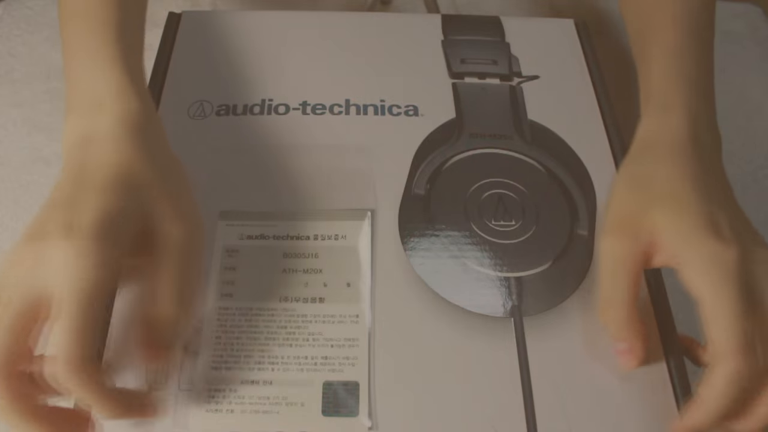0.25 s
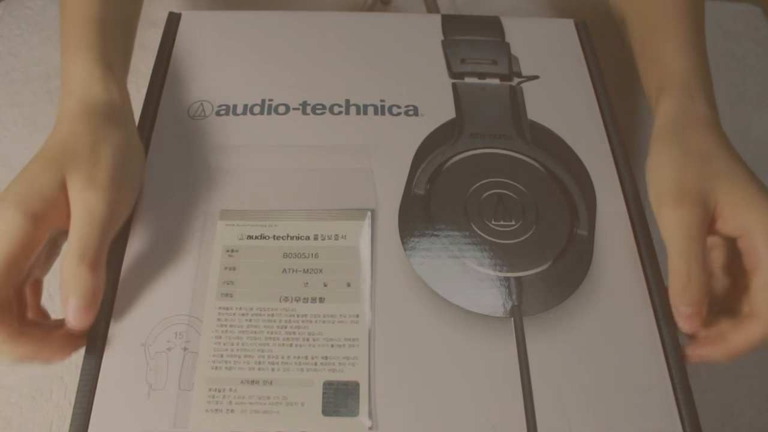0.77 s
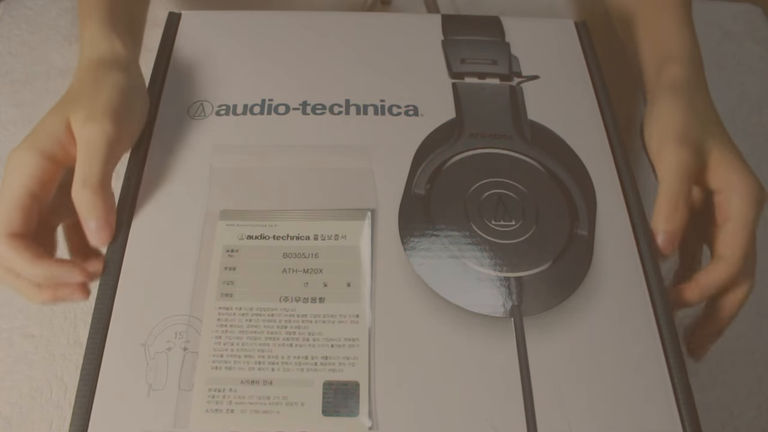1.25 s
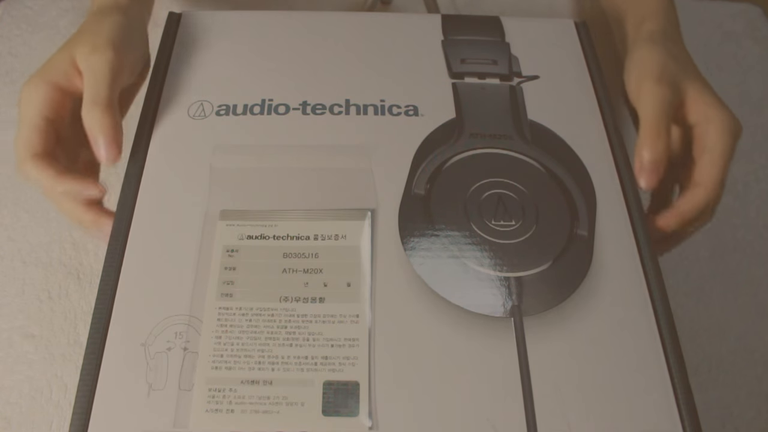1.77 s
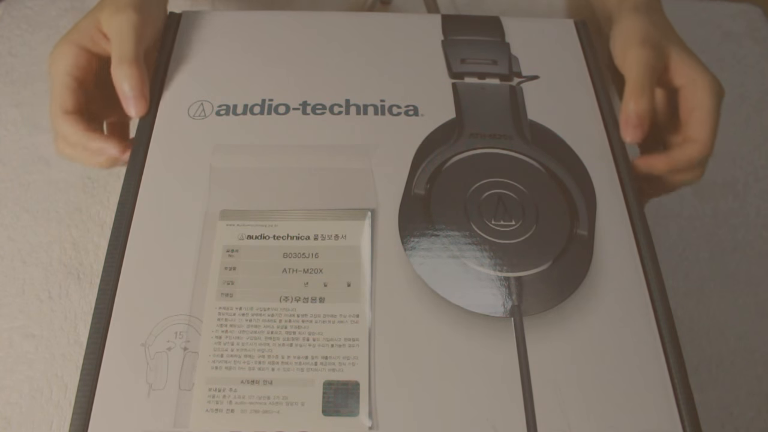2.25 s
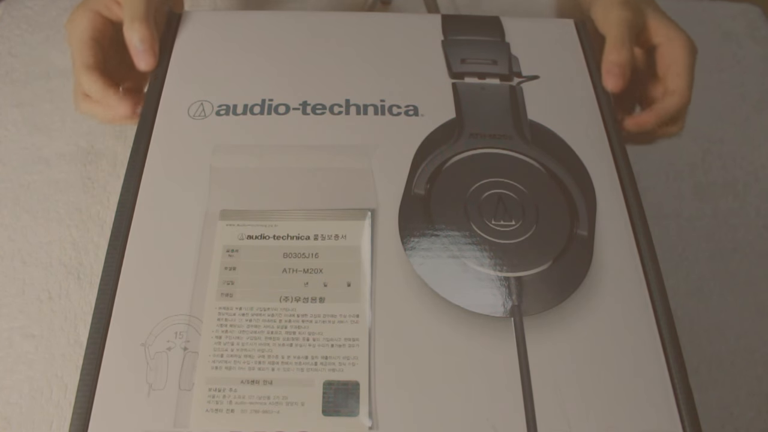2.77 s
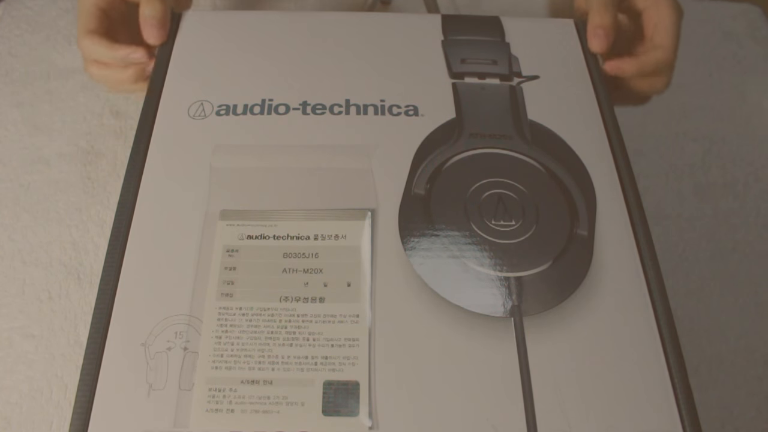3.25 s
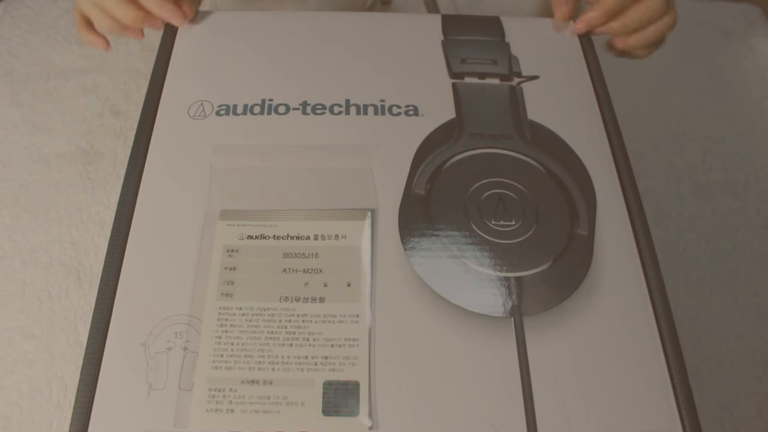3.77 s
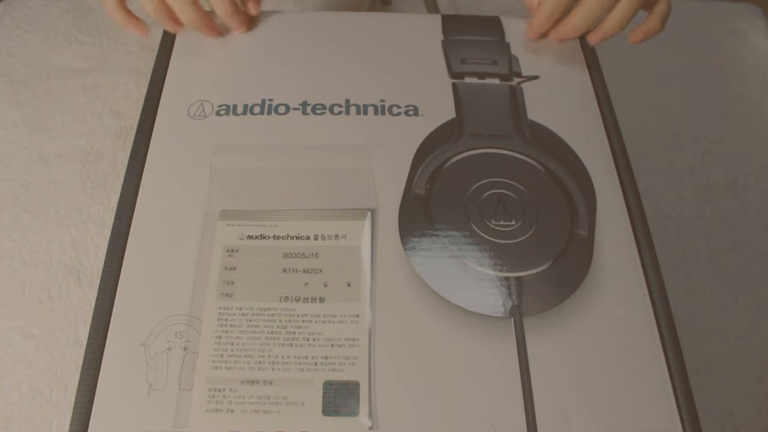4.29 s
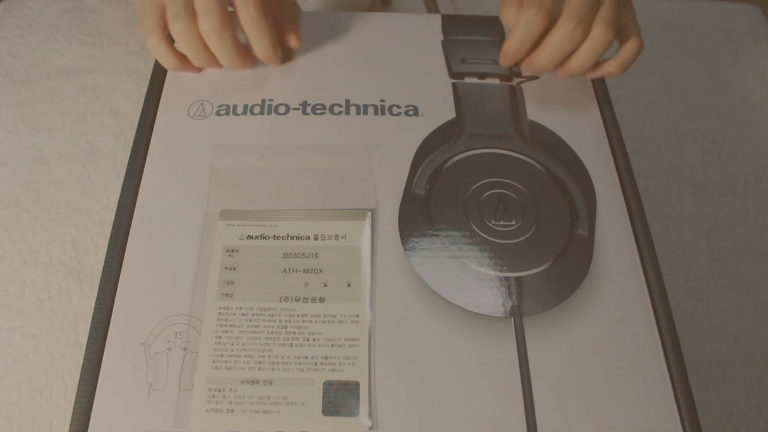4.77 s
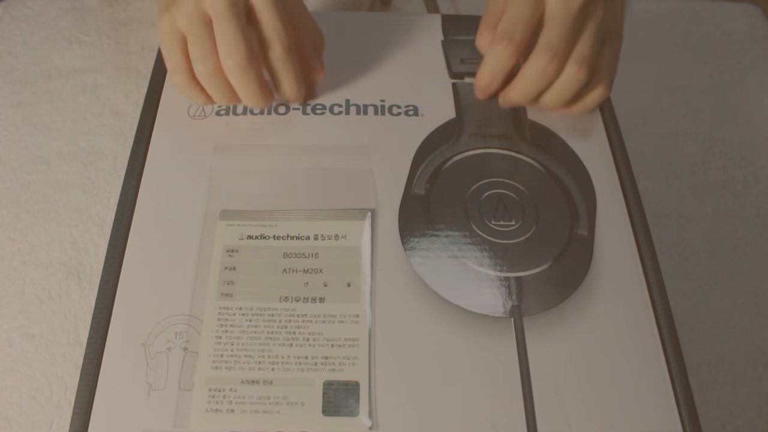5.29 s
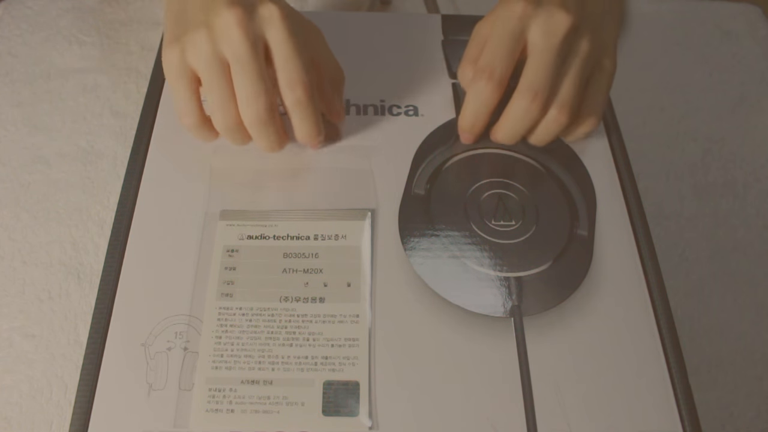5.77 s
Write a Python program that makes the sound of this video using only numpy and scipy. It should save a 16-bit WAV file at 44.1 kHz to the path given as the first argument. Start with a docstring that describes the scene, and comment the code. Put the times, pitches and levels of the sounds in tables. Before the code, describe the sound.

Hands brush quietly over a cardboard box, then fingers tap its side walls in uneven clusters of low, hollow, short thumps with small nail ticks. After a pause with light rubbing, the taps move to the lid and become harder, drier and more frequent. Faint scratchy sliding runs between them. Very close stereo microphones in a quiet small room, with a soft low noise floor.

```python
"""Fingers on a cardboard box

Fingertips and nails tap and slide along a hollow cardboard box in a quiet room, close to a crossed pair of mics.
Each tap is a sum of short decaying box modes plus a tick of noise from the nail, with a room answer.
Sliding skin and nails are fluttering friction noise heard through resonances, over a steady noise floor."""
import sys
import numpy as np
from scipy import signal
from scipy.fft import rfft, irfft, next_fast_len
from scipy.io import wavfile
from scipy.ndimage import uniform_filter1d, map_coordinates

SR = 44100
rng = np.random.default_rng(int(sys.argv[2]) if len(sys.argv) > 2 else 0)


def log_audio(samples):
    """Write samples as a 16-bit WAV file to the path given in sys.argv[1]."""
    # one column per channel
    frames = np.atleast_2d(samples).T
    # limit to full scale, then quantise
    limited = np.clip(frames, -1, 1)
    pcm = np.round(limited * 32767).astype(np.int16)
    wavfile.write(sys.argv[1], SR, pcm)


N = 266364

# strokes of the hands over the box: fastest_s, speeding_up_s, slowing_s,
# shake_db, drag_db, scrape_db, hiss_db, swish_db (levels at the fastest moment),
# drag_bright, scrape_bright, hiss_bright, swish_bright (0 dull to 1 bright), left_right_db
STROKES = [(.006, .006, .05, -58, -49.5, -56, -57.5, -64.5, 0.43, .6, 0.12, 0.63, 1),
           (.048, 0.02, .04, -53, -56.5, -79, -74, -58.5, 0.6, .2, .3, 1, -1.2),
           (.098, 0.015, .05, -58.5, -55, -64.5, -69, -60, 0.15, .7, 0.27, 0.97, 0.3),
           (.181, 0.038, 0.014, -57, -52.5, -66, -66.5, -59, 0.57, 0.11, .3, 0.83, 0),
           (.287, 0.032, 0.2, -59, -63, -64, -63.5, -71, 0.8, 0.68, .45, .8, 1.2),
           (.48, .12, 0.24, -63, -63, -66.5, -66.5, -72, 0.9, 0.85, 0.35, .9, 2.2),
           (.755, 0.29, 0.17, -69, -61, -58.5, -60.5, -64, 0.64, 0.72, 0.68, 0.72, 0.3),
           (.909, 0.14, .055, -67, -56, -64.5, -58, -56, 0.5, 0.56, 0.97, .6, 3),
           (1.05, .1, 0.11, -54, -67, -65.5, -63.5, -66.5, 0.5, 0.67, .6, 0.28, 3),
           (1.15, 0.13, .08, -79, -61, -69.5, -67, -69.5, 0.28, 1, 0.93, 0.4, 4),
           (1.45, .2, 0.1, -89, -85, -91, -76, -79, 0.1, 0.6, 0.74, .45, 3),
           (1.86, 0.047, 0.085, -66, -63, -73.5, -91, -94, .36, 0.1, .4, .45, -2),
           (2.08, 0.04, 0.082, -55, -55.5, -64.5, -68.5, -89, 0.6, .45, .4, .45, 2.5),
           (2.265, 0.072, .015, -61, -60, -65.5, -70.5, -72, .4, .85, 0.27, .3, 6),
           (2.289, 0.015, 0.047, -60, -54, -53, -57.5, -66, 0.5, 0.6, 0.16, 0.4, 0),
           (2.363, 0.024, 0.055, -56, -47, -59.5, -61.5, -60, 0, .3, .55, .05, 5),
           (2.43, 0.048, 0.11, -52.5, -54, -67, -64, -70, 0.11, 0, 0.72, .05, -0.5),
           (2.82, .035, .05, -57, -56, -62, -67.5, -65.5, 0.6, 0.7, 0.22, 0.22, -7),
           (2.885, 0.055, 0.11, -62, -56.5, -63.5, -64.5, -64, 0.6, 0.6, .6, .05, 1.5),
           (3.004, 0.019, 0.096, -46, -48, -62, -53.5, -58, 0.43, 0.15, 0.9, .2, 4.5),
           (3.15, 0.1, 0.22, -66, -67, -75, -66.5, -75, 0.7, 0.38, 0.71, 0.34, 5),
           (3.277, 0.018, 0.07, -51, -52.5, -63, -50, -56.5, 0.46, 0.61, .15, 0.37, -2),
           (3.385, 0.13, 0.094, -53, -57.5, -65, -53, -62.5, 0.66, .44, 0.51, 0.78, 0.5),
           (3.62, 0.11, 0.075, -68, -57.5, -67, -68, -74, 0.46, 0.3, .1, .3, 6),
           (3.69, 0.096, 0.1, -74, -60.5, -64, -68.5, -69.5, 0.5, 0.09, 0.78, .7, -1),
           (3.941, 0.041, 0.072, -58, -60.5, -64, -77, -87, 0.82, 0.046, .4, .45, 0.3),
           (4.1, .08, 0.14, -54, -71, -62.5, -65.5, -75, 0.2, 0.045, 0.77, 0.24, 3.5),
           (4.245, 0.13, 0.12, -50.5, -60.5, -56.5, -61, -77, 0.34, 0.088, 0.21, 0.34, 3.5),
           (4.393, 0.088, 0.063, -54, -60, -54.5, -64, -66.5, 0.67, 0.31, 0.51, 0.12, 2),
           (4.535, 0.021, 0.048, -55, -54, -56, -66.5, -72, 0.4, 0.017, .7, 0.32, 1.2),
           (4.68, 0.11, 0.11, -59, -59.5, -58, -71, -84, .45, 0.24, 0.39, .45, 2),
           (4.798, 0.087, 0.028, -50, -56.5, -51.5, -60, -62, 0.7, 0.27, .7, .2, 0.3),
           (4.87, .065, 0.11, -69, -59, -56, -68, -69, 0.93, 0.047, 0.37, 0.49, -4.5),
           (4.97, 0.11, 0.017, -69, -55.5, -57.5, -76, -69.5, 0.86, 0.017, 0.16, .9, -1),
           (5.114, 0.023, 0.019, -61, -53, -64, -76, -80, 0.6, 0.43, 0.25, .45, 1),
           (5.21, 0.047, 0.11, -60, -58.5, -59.5, -75, -79, 0.5, .05, .4, .1, -3.5),
           (5.347, 0.11, 0.018, -55, -57, -55, -61, -58, .6, 0.33, 0.75, 0.06, -3),
           (5.39, 0.043, 0.17, -74, -58.5, -64.5, -71.5, -72, 0.5, 0.02, .8, .45, -1.2),
           (5.655, 0.041, 0.051, -57, -69, -78, -81, -87, .4, .55, .55, .45, 3),
           (5.885, 0.027, 0.03, -55, -64, -63, -64.5, -76, 0.2, 0.054, 0.55, .6, -3),
           (5.96, 0.046, 0.023, -61, -66, -66.5, -73, -70, .45, 0.017, 0.37, 0.53, -2.2)]


def amp(db):
    """Gain of a level in dB."""
    return 10 ** (np.asarray(db) / 20)


def unit(x):
    """Scaled to rms 1."""
    return x / np.sqrt(np.mean(x ** 2) + 1e-20)


def along(points, hz):
    """Values read between (Hz, value) points on a log frequency axis."""
    point_hz, value = np.transpose(points)
    return np.interp(np.log(hz + 1), np.log(point_hz + 1), value)


def filtered(x, response):
    """x times a complex response of frequency, padded so that the ringing does not wrap round."""
    m = next_fast_len(x.shape[-1] + 8192)
    return irfft(rfft(x, m) * response(np.fft.rfftfreq(m, 1 / SR)), m)[..., :x.shape[-1]]


def wobble(rate):
    """A smooth random curve, rate knots a second."""
    knots = rng.standard_normal(int(N * rate / SR) + 4)
    return map_coordinates(knots, [np.arange(N) * rate / SR])


def paired(a, b, alike):
    """Left and right from a shared and a differing signal; alike is their correlation at equal powers."""
    turn = np.arccos(np.clip(alike, -1, 1)) / 2
    shared, differing = np.cos(turn) * a, np.sin(turn) * b
    return np.array([shared + differing, shared - differing])


def sides(db):
    """Left and right gains of a level difference."""
    return amp(np.array([db / 2, -db / 2]))


def taps():
    """Each finger rings the modes at strengths set by where and how hard it lands; the nail adds a short tick."""
    # finger landings: start_s, knock_db, boom_db, hollow_db, rap_db, click_db, tick_db, tick_hz, thud_db,
    # left_right_db (levels before the trims below)
    landings = [(0.257, -48.5, -59, -56, -58.5, -59, -55, 4330, -62, 1.5),
                (0.68, -50.5, -46, -57, -77, -53, -63, 5770, -61, -1),
                (0.844, -54, -46.5, -58, -66, -62, -56, 4860, -58, -5),
                (1.004, -55, -54.5, -58, -65, -65, -58, 4960, -60, -6),
                (1.553, -37, -39.5, -57, -55, -48.5, -61, 6960, -54, -5.5),
                (1.667, -40.5, -36.5, -46, -60, -53, -55.5, 4830, -54, -5),
                (1.812, -35, -31, -37, -50, -50, -45, 5060, -46.5, 5),
                (1.852, -68, -42.5, -61, -68, -70, -75, 4610, -61, -1),
                (2.025, -41.5, -54, -39.5, -59, -61, -57.5, 5430, -48.5, -2.5),
                (2.054, -36.5, -34.5, -39, -65, -52.5, -53, 5060, -52, 5),
                (2.066, -54, -56, -45.5, -60, -62, -69, 4580, -51, -8),
                (2.243, -53, -43.5, -51, -71, -61, -65, 3980, -53, 0),
                (2.278, -32, -41, -36, -60, -36, -39.5, 4970, -50, -7.5),
                (2.334, -35.5, -37, -36, -56, -52, -53, 4000, -56, -3),
                (2.351, -31, -30, -32, -51, -51, -48.5, 4600, -48.5, 0),
                (2.391, -53, -42, -48.5, -64, -65, -64, 5920, -51, 0.5),
                (2.786, -48.5, -56, -73, -73, -64, -63, 3900, -67, -6),
                (2.8, -45.5, -54, -49, -64, -54, -49.5, 3900, -58, -3),
                (2.816, -44.5, -45.5, -45.5, -63, -64, -56, 3890, -51, -5),
                (2.864, -42, -55, -56, -65, -55, -61, 5200, -63, 4),
                (2.988, -32, -32, -30, -55, -58, -46, 6260, -51, 3.5),
                (3.243, -52, -60, -46.5, -64, -57, -60, 4830, -61, 1),
                (3.267, -35, -48, -41.5, -58, -49.5, -42.5, 4030, -57, -5.5),
                (3.353, -52.5, -61, -47, -67, -57, -46.5, 4890, -56, -8.5),
                (3.553, -63, -64, -50, -67, -74, -60.5, 3880, -65, 2.0),
                (3.631, -54, -54, -48.5, -61, -68, -58, 4800, -55, 12),
                (3.886, -43, -51, -49, -54, -61, -62, 4690, -53, -3.0),
                (4.479, -27, -37, -37.5, -40.5, -30.5, -41.5, 3640, -43.5, -5),
                (4.522, -39.5, -53, -41, -38, -36.5, -46.5, 4930, -47, 4.5),
                (4.684, -33.5, -38, -41.5, -38, -69, -51.5, 4820, -46, 3),
                (4.694, -28, -35, -40, -51, -39.5, -59, 3860, -49, -4.5),
                (4.935, -41, -50, -48, -49, -60, -63, 3920, -67, 3),
                (5.009, -26.5, -41, -40.5, -38, -38, -46.5, 6700, -63, -4.5),
                (5.042, -56, -60, -58, -55, -65, -73, 4970, -55.5, 6),
                (5.104, -45, -67, -55, -54, -65, -71, 6550, -70, -3),
                (5.195, -42.5, -44, -36.5, -48, -62, -62, 4830, -50, 0),
                (5.275, -38, -40, -45, -48, -57, -68, 5790, -60, -2.5),
                (5.352, -38.5, -60, -46.5, -51, -53, -55, 5960, -63, -3),
                (5.388, -51, -58, -58, -55, -70, -71, 6180, -72, 1.5),
                (5.554, -38.5, -48, -43, -47, -57, -52.5, 4390, -61, -1),
                (5.616, -32.5, -36.5, -35, -43, -43, -46, 4540, -51, 4.5),
                (5.639, -62, -49, -55, -49, -70, -66, 5400, -56, -1.5),
                (5.642, -41, -48, -42, -49, -55, -57, 5420, -52, 1),
                (5.68, -61, -58, -54, -68, -76, -83, 5720, -61, 3),
                (5.757, -69, -59.5, -63, -67, -67, -72, 3880, -66, -3),
                (5.861, -38.5, -34, -41.5, -43.5, -52, -56, 5100, -46.5, 0.5),
                (6.027, -45, -73, -42.5, -53, -54, -66, 4450, -75, 7),
                (6.035, -50, -71, -41.5, -50, -62, -55, 5200, -72, -7)]
    # modes of the box: pitch_hz, level_db, t60_s (ringing free of hands)
    modes = [(65, -2.5, 0.25), (95.5, 6, 0.083), (243, -3.5, 0.065), (271, -15, 0.043), (284.4, 0.5, 0.087),
             (324.6, 1, 0.046), (392.3, 3.5, 0.035), (463.6, 1, 0.032), (595, 0, 0.031), (698, 7.5, 0.016),
             (908, -6.5, 0.032), (1149, 4.5, 0.024), (1343, 1, 0.036), (1796, -0.5, 0.023),
             (2020, 0.5, 0.014), (2500, -6.5, 0.0084), (3450, -21, 0.027)]
    # centres of thud, boom, hollow, knock, rap and click: pitch_hz
    centres = [90, 250, 420, 720, 1300, 2100]
    # colour of the nail tick: pitch_hz, level_db (relative density per Hz)
    tick_colour = [(1500, -9), (3500, -2.5), (7000, -6), (9000, -9.5), (11500, -14), (16000, -38)]
    on_lid_s = 4  # the hands leave the side walls for the lid

    out, t = np.zeros((2, N + SR)), np.arange(SR // 4) / SR
    hz, mode_db, t60 = np.transpose(modes)[:, :, None]
    chance = rng.standard_normal((len(landings), 4, len(modes), 1))
    grit = rng.standard_normal((len(landings), 2, SR // 20))
    for landing, luck, noise in zip(landings, chance, grit):
        s, knock_db, boom_db, hollow_db, rap_db, click_db, tick_db, tick_hz, thud_db, pan_db = landing
        groups_db = [thud_db + 7.5, boom_db + 5.5, hollow_db + 8.5, knock_db + 0.19, rap_db + 0.24, click_db + 4.5]
        # share: part of the free ring that the resting hands leave
        # path: cycles of travel; from a wall, slow low bending waves reach the lid late
        # soft: cycles of build-up under the soft finger pad
        share, path, soft = (0.68, 0.03, 0.25) if s > on_lid_s else (0.83, 0.3, 0.33)
        late = np.maximum(t - path / hz, 0)
        scatter_db, detune = 1.5 * luck[0], 1 + 0.015 * luck[1]
        strength_db = along(list(zip(centres, groups_db)), hz) + mode_db + scatter_db
        rise = 1 - np.exp(-late * hz / soft)
        fall = amp(strength_db - 60 * late / (t60 * share))
        turn = 2 * np.pi * hz * detune * late
        # the whole box rocks: the thud reaches the capsules out of step (radians)
        skew = 1.5 * luck[3] * np.clip(1.9 - hz / 140, 0, 1)
        ring = fall * rise * np.sin([turn + skew, turn - skew])
        near = np.clip(hz / 600, 0.3, 1.3)  # low modes move the whole lid and stay near the middle
        heard = sides(pan_db * near + 4.35 * luck[2]) * ring
        rocking = heard[:, :2].sum(axis=1)  # the two lowest modes bypass the panels' high-pass
        body = rocking + filtered(heard[:, 2:].sum(axis=1), radiated)

        u = t[:noise.shape[1]]
        sharp_then_faint = amp(-60 * u / 0.0012) + amp(-16 - 60 * u / 0.018)
        snap = paired(*noise, alike=0.66) * sharp_then_faint

        def colour(f):
            """The tick's broad colour with a peak at its own pitch."""
            peak_db = 10 * np.exp(-(np.log((f + 1) / tick_hz) / 0.092) ** 2)
            return amp(along(tick_colour, f) + peak_db)

        tick = amp(tick_db + 18) * sides(pan_db)[:, None] * filtered(snap, colour)
        start = round((s + 0.0005) * SR)
        out[:, start:start + len(t)] += body
        out[:, start:start + len(u)] += tick
    return out[:, :N]


def radiated(f):
    """Causal second-order high-pass: low down, the panels move air round their edges and radiate little."""
    w = 1j * f / 221  # corner in Hz
    return w ** 2 / (1 + w / 0.58 + w ** 2)


def sliding():
    """Skin drags the lid, nails scrape the card and swish over its gloss; the hands also shake the box."""
    # colour of the shaken box: pitch_hz, level_db (relative density per Hz)
    shake_colour = [(20, -31), (32, -3), (65, 6), (110, -15.5), (160, -13), (300, -37.5)]
    # resonances that friction wakes, a dull row then a bright row in each table:
    # pitch_hz, width_hz, level_db (of one pass of two)
    drag_modes = [
        [(221.6, 44, -2.5), (291, 28, 0.5), (363, 53, -4.5)],
        [(399, 39, -1), (493, 95, 0), (555, 143, 1), (770, 290, -3), (956, 200, -7)],
    ]
    scrape_modes = [
        [(1060, 234, 0), (1494, 280, 1.5), (1897, 390, -0.5), (2960, 630, -9)],
        [(1480, 490, -7), (1898, 176, 2), (2250, 440, 1)],
    ]
    hiss_modes = [
        [(2610, 430, -1.5), (3320, 760, 1), (3820, 650, 0.74), (4600, 520, -2.2)],
        [(3200, 400, -6.5), (3900, 510, -1.5), (4950, 850, 0.5), (5590, 630, 1.5), (6250, 560, -3.5)],
    ]
    swish_modes = [
        [(6600, 3100, -0.14), (9740, 1900, -0.55), (10560, 1350, -1.2)],
        [(9300, 3000, -4), (12200, 2200, -1), (15200, 6300, -8)],
    ]

    shake_db, drag_db, scrape_db, hiss_db, swish_db, *bright = np.transpose(STROKES)[3:-1]
    t, power = stroke_power()

    def summed(db, share):
        """Left and right gain over time from the added powers of all strokes."""
        total = np.tensordot(amp(2 * db) * share, power, 1)
        return np.sqrt([np.interp(np.arange(N) / SR, t, p) for p in total])

    def mixed(pair, db, share):
        """A dull and a bright friction sound, shared out by the brightness of each stroke."""
        dull, shiny = pair
        return summed(db, 1 - share) * dull + summed(db, share) * shiny

    def rubbed(rows, **grain):
        """The dull and the bright friction sound of a table."""
        return [friction(resonant(row), **grain) for row in rows]

    flutter = wobble(30)  # pressure of the fingertips, felt by drag, scrape, hiss and swish
    rumble = friction(lambda f: amp(along(shake_colour, f)), rate=15, rough_db=3.8, alike=0.35, patchy_db=0.8)
    shake = summed(shake_db, 1).mean(axis=0) * rumble
    drag = rubbed(drag_modes, rate=90, rough_db=3.5, alike=0.93, patchy_db=-2.4)
    drag = amp(1.2 * flutter) * mixed(drag, drag_db, bright[0]).mean(axis=0)  # heard in the middle
    scrape = rubbed(scrape_modes, rate=140, rough_db=2.1, alike=0.8, patchy_db=1.3)
    scrape = mixed(scrape, scrape_db, bright[1])
    hiss = rubbed(hiss_modes, rate=150, rough_db=1.6, alike=0.65, patchy_db=2.7)
    hiss = mixed(hiss, hiss_db, bright[2])
    swish = rubbed(swish_modes, rate=210, rough_db=1.8, alike=0.32, patchy_db=1.8)
    swish = mixed(swish, swish_db, bright[3])
    return shake + drag + amp(0.52 * flutter) * (scrape + hiss + swish)


def stroke_power():
    """Each stroke grows to its fastest moment, slows and lifts off: left and right power, strokes x 2 x time."""
    t = np.arange(0, N + 32, 32) / SR
    touch_s = 0.014  # time to touch down
    levels_db = [-45, -10, 0, -11.5, -45]  # touching down, moving off, fastest, slowed, lifted
    power = []
    for s, up, down, *_, pan_db in STROKES:
        moments = [-up - touch_s, -up, 0, down, 2 * down]  # lifting off takes as long as slowing
        shape_db = np.interp(t - s, moments, levels_db, left=-120, right=-120)
        power.append(amp(2 * shape_db) * sides(2 * pan_db)[:, None])
    return t, np.array(power)


def friction(response, rate, rough_db, alike, patchy_db):
    """Dense slips whose strength flutters, with random patches over time and pitch, heard through resonances."""
    z = signal.stft(rng.standard_normal((2, N)), nperseg=512)[2]
    field = uniform_filter1d(rng.standard_normal(z.shape[1:]), size=6, axis=0)  # smooth over pitch
    field = uniform_filter1d(field, size=10, axis=1)  # smooth over time
    noise = signal.istft(z * amp(patchy_db * unit(field)), nperseg=512)[1][:, :N]
    slips = noise * amp(rough_db * wobble(rate))
    return unit(paired(*filtered(slips, response), alike))


def resonant(modes):
    """Response of a row of resonances, the whole row passed twice for dark valleys outside them."""
    def response(f):
        """Band-passes of alternating sign, added and squared."""
        total = 0
        for k, (centre, width, db) in enumerate(modes):
            damping = 1j * f * width
            total = total + (-1) ** k * amp(db) * damping / (centre ** 2 - f ** 2 + damping)
        return total ** 2
    return response


def room(x):
    """Each frequency of the box's cavity and the room dies at its own speed, in a tail of decaying noise."""
    # decay of cavity and room: pitch_hz, t60_s
    decay = [(100, 0.56), (300, 0.11), (1000, 0.26), (3000, 0.066), (10000, 0.2)]
    hz, t, z = signal.stft(rng.standard_normal((2, SR // 2)), SR, nperseg=256)
    fall = amp(-60 * t / along(decay, hz)[:, None])
    tail = paired(*signal.istft(z * fall, SR, nperseg=256)[1], alike=0.91)
    tail = tail / np.linalg.norm(tail[0])
    delayed = np.pad(x, ((0, 0), (round(0.0069 * SR), 0)))  # 6.9 ms before the answer begins
    return signal.fftconvolve(delayed, tail, axes=1)[:, :N]


def air():
    """The steady floor of room and microphone noise, nearly unrelated between the two capsules."""
    # quiet room and microphone hiss: pitch_hz, level_db (relative density per Hz)
    floor_colour = [(15, -33), (25, 1.5), (43, 3), (59, -3), (119, -6.5), (174, -10.5), (370, -13),
                    (854, -20), (2440, -28), (5060, -32), (5640, -33), (6810, -33.5), (15700, -38.5)]
    noise = filtered(rng.standard_normal((2, N)), lambda f: amp(along(floor_colour, f)))
    return amp(-59.5) * unit(paired(*noise, alike=0.042))


def scene():
    """Taps with their room answer, sliding and floor."""
    knocks = taps()
    return knocks + amp(-12) * room(knocks) + sliding() + air()


def record(dry):
    """Nothing is kept above the band limit of 15.9 kHz."""
    return filtered(dry, lambda hz: hz < 15900)


dry = scene()
out = record(dry)
log_audio(out)
```